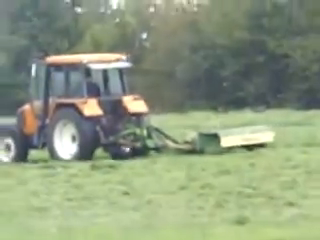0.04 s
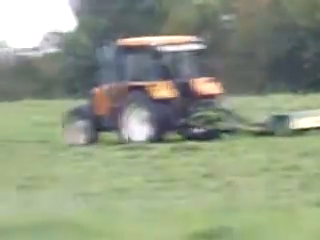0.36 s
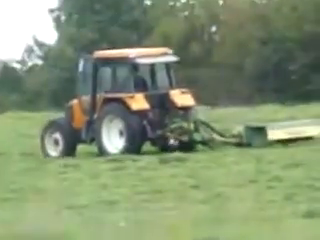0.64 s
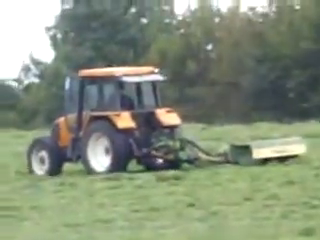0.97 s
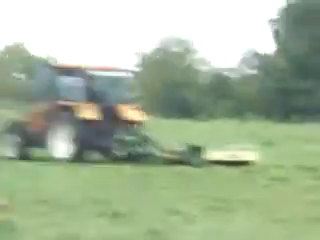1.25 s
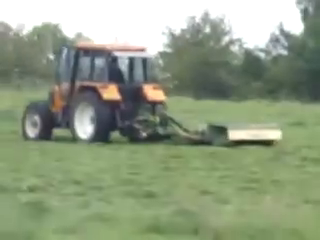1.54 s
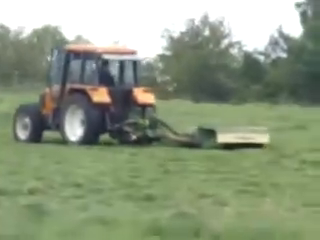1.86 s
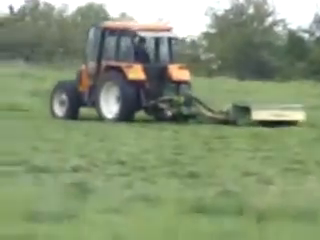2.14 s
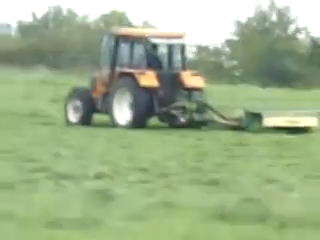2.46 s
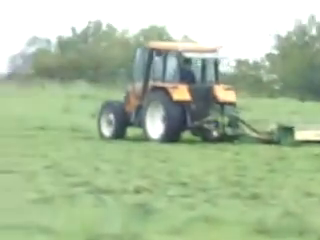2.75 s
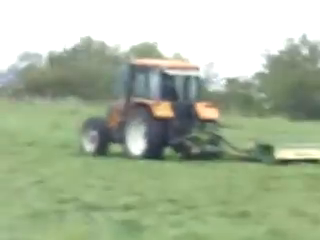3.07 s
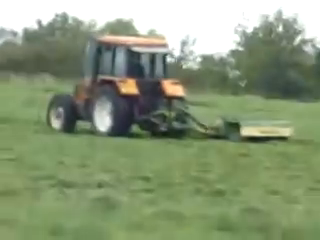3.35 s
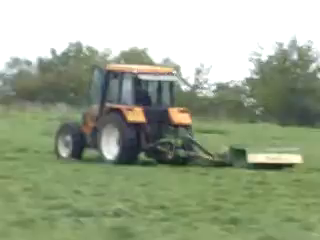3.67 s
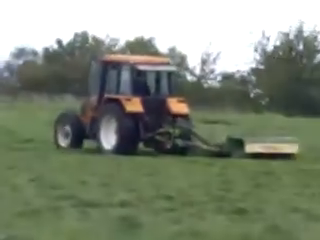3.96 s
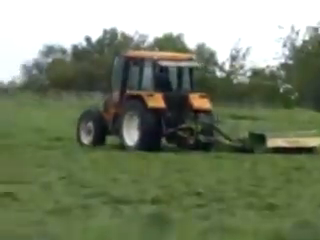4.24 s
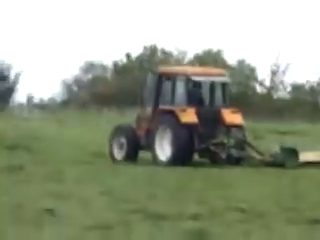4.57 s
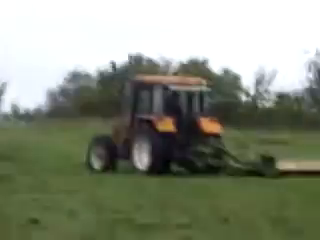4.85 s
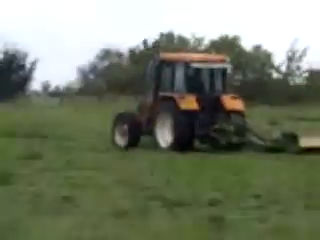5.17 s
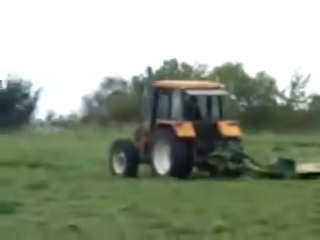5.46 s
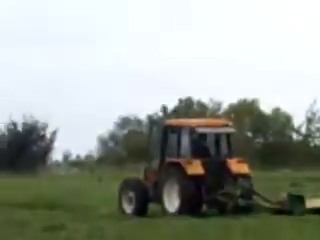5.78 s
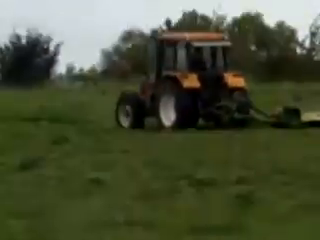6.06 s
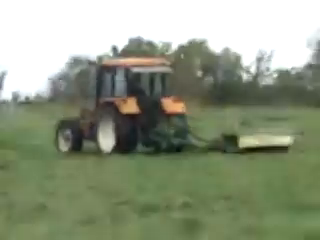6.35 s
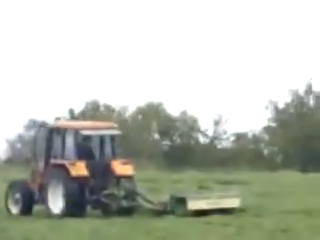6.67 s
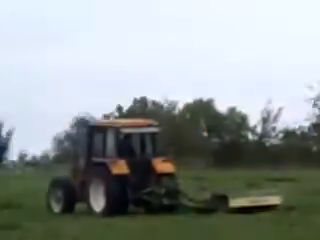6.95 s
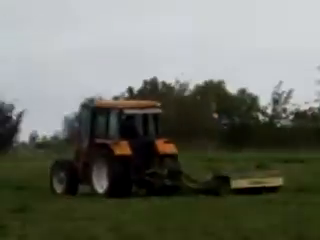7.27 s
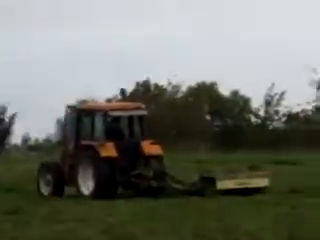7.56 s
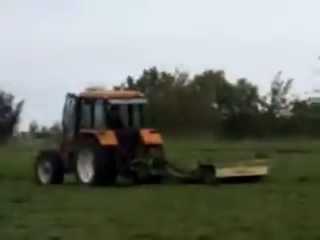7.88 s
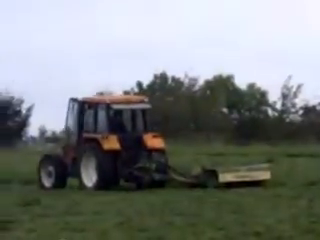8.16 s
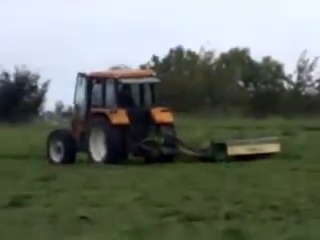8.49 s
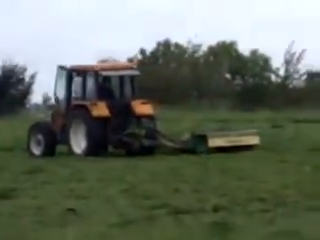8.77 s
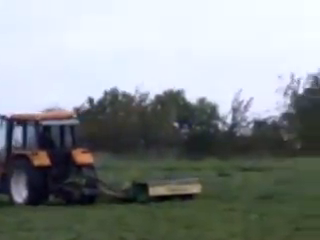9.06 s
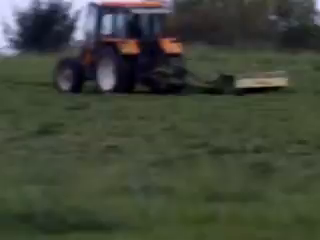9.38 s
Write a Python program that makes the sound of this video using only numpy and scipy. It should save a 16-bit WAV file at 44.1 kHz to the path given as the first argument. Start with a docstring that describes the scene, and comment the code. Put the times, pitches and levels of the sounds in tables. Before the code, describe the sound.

A diesel tractor pulls a rotary mower across an open field, heard from a distance on a hand-held microphone with a slightly dull sound. From the start, engine and rotor make a low, throbbing drone under a steady roar of clatter and cut grass. At about 1.1 seconds the sound cuts out for an instant, then fades back in. A faint gear whine swells around 2.5 seconds. Small ticks sound on the microphone near 0.5 seconds, and fingers rub and bump it at about 3.7 seconds. Near 4.9 seconds a sharp, close knock briefly dips the level, followed by more ticks until 5.5 seconds. The steel linkage rattles lightly, most from 5 to 6.5 seconds. The engine labours briefly near 3, 7.6 and 8.4 seconds, and keeps droning, slightly farther away, until the end at about 9.4 seconds.

```python
"""A diesel tractor pulls a rotary mower across a field, about 40 m from a hand-held mono camera.
From the start, exhaust and rotor throb at nearly one pitch under a roar of engine clatter and cut grass.
Just after a second the sound cuts out and fades back in; from 3 s the tractor turns its tail to us.
Fingers rub and tick right by the microphone, and near 5 s one sharp knock ducks the gain.
The linkage then rattles over rough ground, and the engine labours twice more as it draws away."""
import sys
import numpy as np
from scipy import signal
from scipy.fft import rfft, irfft
from scipy.io import wavfile
from scipy.ndimage import uniform_filter1d

SR = 44100
rng = np.random.default_rng(int(sys.argv[2]) if len(sys.argv) > 2 else 0)


def materialize(psi):
    """Save the field psi as 16-bit PCM at rate SR to the path in sys.argv[1].

    A 1-D psi becomes a single channel; in a 2-D psi each row is a channel.
    """
    bounded = np.clip(np.atleast_2d(psi).T, -1, 1)
    quanta = np.round(bounded * 32767).astype(np.int16)
    wavfile.write(sys.argv[1], SR, quanta)


N = 415422
T = np.arange(N) / SR
HZ = np.fft.rfftfreq(N, 1 / SR)
CYLINDERS, ROTOR_TURNS_PER_FIRING = 6, 1.0627
BREAK_START_S, BREAK_END_S = 1.098, 1.1215  # the sound cuts out between these times
OPENING = T < BREAK_END_S


def amp(db):
    """Decibels to gain."""
    return 10 ** (np.asarray(db) / 20)


def unit(x):
    """Scales to rms 1."""
    return x / np.sqrt(np.mean(x ** 2) + 1e-20)


def curves(rows):
    """Each column of a time table, at every sample."""
    times, *columns = np.transpose(rows)
    return [np.interp(T, times, column) for column in columns]


def shape(x, points):
    """Filters x by a gain curve of (Hz, dB) points."""
    hz, db = np.transpose(points)
    return irfft(rfft(x) * amp(np.interp(np.log(HZ + 1), np.log(hz), db)), N)


def band(x, low_hz, high_hz):
    """The part of x between two frequencies."""
    return irfft(rfft(x) * (HZ > low_hz) * (HZ < high_hz), N)


def drift(rate_hz):
    """Slow random motion of rms 1, up to about rate_hz."""
    return unit(irfft(rfft(rng.standard_normal(N)) * np.exp(-(HZ / rate_hz) ** 2), N))


def hump(peak_s, rise_s, fall_s):
    """A smooth bell of height 1 around peak_s."""
    return np.exp(-np.maximum((peak_s - T) / rise_s, (T - peak_s) / fall_s) ** 2)


def impulses(per_s, heights):
    """Clicks at random times, with heights drawn from a range."""
    return (rng.random(N) < per_s / SR) * rng.uniform(*heights, N)


def add(mix, start_s, sound):
    """Mixes a sound in at start_s."""
    part = mix[round(start_s * SR):][:len(sound)]
    part += sound[:len(part)]


def harmonics(turns, rows, flutter_hz):
    """Shaft harmonics from (multiple, dB, flutter depth) rows; load and air flutter level and phase."""
    out = np.zeros(N)
    for multiple, db, flutter in rows:
        angle = 2 * np.pi * round(multiple) * turns
        in_phase = np.cos(angle) * (1 + flutter * drift(flutter_hz))
        quadrature = np.sin(angle) * flutter * drift(flutter_hz)
        out += amp(db) * unit(in_phase + quadrature)
    return out


def low_pass(x, edge_hz):
    """A steep band limit on both channels."""
    taps = signal.firwin(511, edge_hz, window=("kaiser", 8), fs=SR)
    return signal.oaconvolve(x, taps[None], "same")


# A low hum in the background. Each row: time in seconds, pitch in Hz, level in dB.
HUM_PATH = [(0, 59.2, -51), (1.1, 59.6, -52), (1.13, 52.5, -44), (3.9, 51.7, -42.5), (4.8, 57.4, -45),
            (9.4, 58.4, -43)]


def hum():
    """A faint wandering tone below the engine note."""
    hz, db = curves(HUM_PATH)
    return amp(db) * unit(np.sin(2 * np.pi * np.cumsum(hz) / SR))


# The steel linkage behind the tractor. Each row: pitch in Hz, relative level in dB, decay in seconds.
LINKAGE_MODES = [(2106, 1.5, 0.015), (2198, 0, 0.0099), (2500, -14, .003), (3430, -13.5, .003)]


def linkage_rattle():
    """Loose joints knock together at random, harder over one patch of rough ground."""
    knocks = impulses(per_s=70, heights=(0.74, 1))
    t = T[:SR // 20]
    ring = sum(amp(db) * np.sin(2 * np.pi * hz * t) * np.exp(-t / decay)
               for hz, db, decay in LINKAGE_MODES)
    rough_ground = hump(5.85, 0.75, 0.75)
    return amp(-45 + 9.5 * rough_ground) * unit(signal.oaconvolve(knocks, ring)[:N])


# Skin on the case, heard close up. Each row: frequency in Hz, relative level in dB.
RUB_SPECTRUM = [(200, -19), (1000, -13.5), (2000, 0.5), (3000, -4), (4200, 1.5), (5200, -2.5), (6200, -5.5),
                (7200, -18)]
# Finger strokes by the microphone. Each row: peak time in seconds, level in dB, rise and fall in seconds.
FINGER_STROKES = [(3.659, -24.5, 0.01, 0.011), (3.72, -17.5, 0.013, 0.025), (3.82, -34.5, .01, .04),
                  (4.859, -24, 0.033, 0.013), (4.92, -30, 0.024, 0.093)]


def finger_rub():
    """Skin drags over the case in tiny slips; each stroke swells and dies inside a light, longer drag."""
    pressure = np.zeros(N)
    drag_db, drag_stretch = -14, 12
    for peak_s, db, rise, fall in FINGER_STROKES:
        from_peak = np.maximum((peak_s - T) / rise, (T - peak_s) / fall)
        pressure += amp(db) * (np.exp(-from_peak) + amp(drag_db) * np.exp(-from_peak / drag_stretch))
    slips = rng.standard_normal(N) * amp(2.0 * drift(250))
    catches = impulses(per_s=540, heights=(-1.2, 1))  # ridges of the skin catch and let go
    return pressure * unit(shape(slips + amp(-4) * unit(catches), RUB_SPECTRUM))


# Ticks on the camera body. Each row: start in seconds, level in dB, decay in seconds, centre in Hz,
# half width in octaves.
FINGER_TICKS = [(0.453, -15, 0.0027, 2700, 0.3), (0.457, -10.5, 0.00098, 3380, 0.4),
                (.5292, -10, .0016, 2780, 0.64), (2.128, -24.5, 0.0048, 3000, 0.65),
                (2.884, -23, .008, 3350, .7), (3.7047, -17, 0.0053, 2720, 0.6),
                (3.71, -10, 0.0026, 4100, 1.2), (4.761, -22, .003, 3600, .8),
                (4.808, -21, .0027, 3550, 0.73), (4.8523, -7, 0.0016, 4000, 2.1),
                (5.2638, -8.5, 0.0033, 4030, 0.44), (5.274, -16.5, 0.012, 4200, 0.36),
                (5.311, -20.5, 0.016, 3850, 0.54), (5.3647, -14, .005, 4580, 0.36),
                (5.372, -17, 0.0088, 3920, 0.49), (5.4913, -14, 0.014, 4680, 0.4),
                (5.503, -18.5, 0.015, 4680, 0.15)]


def finger_ticks():
    """In each tick a snap and a little dying grit ring one band of the case."""
    out, t = np.zeros(N), T[:SR // 4]
    snap = 5.1 * (t == 0)
    for start_s, db, decay, centre_hz, octaves in FINGER_TICKS:
        rising, dying = 1 - np.exp(-t / (0.035 * decay)), np.exp(-t / decay)
        grit = rng.standard_normal(len(t)) * rising * dying
        edges_hz = np.clip(centre_hz * 2 ** (octaves * np.array([-1, 1])), 1, SR / 2 - 1)
        b, a = signal.butter(1, edges_hz, "bandpass", fs=SR)
        ring = signal.lfilter(b, a, signal.lfilter(b, a, snap + grit))
        add(out, start_s, amp(db) * unit(ring) * np.sqrt(np.mean(dying ** 2)))
    return out


# Bumps at the microphone. Each row: start in seconds, push in dB, direction as a sign, decay in seconds.
MICROPHONE_BUMPS = [(3.7106, -16.5, -1, 0.04), (4.857, -9.5, 1, 0.031), (5.268, -22, 1, 0.027)]


def bumps():
    """Each bump presses one way on the microphone and eases off."""
    out, t = np.zeros(N), T[:SR // 4]
    for start_s, db, sign, decay in MICROPHONE_BUMPS:
        push = (1 - np.exp(-t / 0.0015)) * np.exp(-t / decay)
        add(out, start_s, np.sign(sign) * amp(db) * push)
    return out


def knock(start_s=4.8542, ring_hz=5450):
    """One hard knock on the camera: a short push, then a brief ring of the case."""
    out, t = np.zeros(N), T[:SR // 4]
    push = np.exp(-t / 0.000092)
    ring = 0.41 * np.sin(2 * np.pi * ring_hz * t) * np.exp(-t / 0.0025)
    add(out, start_s, amp(5.5) * (push + ring))
    return out


# Resonances of the camera's plastic shell. Each row: centre in Hz, width in Hz, lift in dB.
SHELL_MODES = [(3400, 110, 3), (3900, 140, 4), (4400, 110, 1), (4720, 120, 2.5)]
# The microphone's treble roll-off on the touches. Each row: frequency in Hz, gain in dB.
MICROPHONE_ROLLOFF = [(20, 5), (4700, 0), (5300, -4.5), (6200, -7.5), (6700, -18.5), (7200, -39)]


def handling():
    """Every touch rings the shell; the microphone dulls the touches above 5 kHz."""
    touches = finger_rub() + finger_ticks() + bumps() + knock()
    ring = sum((amp(db) - 1) * signal.lfilter(*signal.iirpeak(hz, hz / width, fs=SR), touches)
               for hz, width, db in SHELL_MODES)
    return shape(touches + ring, MICROPHONE_ROLLOFF)


def gear_whine(firings):
    """Gears beam their whine sideways: clear at first, then faint except as the beam sweeps past us."""
    beam = hump(peak_s=2.59, rise_s=1.8, fall_s=0.31)
    level_db = np.where(OPENING, -40.5, -49 + 9 * beam) + 0.5 * drift(2.8)
    return amp(level_db) * harmonics(firings, [(5, 0, 0.27)], flutter_hz=4.3)


# Silencer and mower deck from across the field. Each row: frequency in Hz, relative level in dB.
BOOM_SPECTRUM = [(15, -28), (40, -16.5), (70, -7.5), (100, -10.5), (125, -0.5), (165, 0.5), (195, -4),
                 (240, -13.5), (320, -18), (450, -29.5), (900, -76.5)]


def boom():
    """The silencer and the mower deck boom with steady low noise."""
    return amp(-33.5) * unit(shape(rng.standard_normal(N), BOOM_SPECTRUM))


def exhaust_note(firings):
    """The exhaust pulses make one steady low tone at the firing rate."""
    return harmonics(firings, [(1, -33.5, 0.048)], flutter_hz=3)


# Side tones of the exhaust. Each row: multiple of the engine cycle, relative level in dB, flutter depth.
UNEVEN_TONES = [(7, -52.5, .4), (8, -44.5, 0.9), (9, -38.5, 0.4), (10, -41.5, 1), (11, -52.5, 0.7),
                (12, -41.5, 0.7), (13, -49, 1)]
# Moments when the engine labours. Each row: peak time in seconds, lift in dB, half length in seconds.
ENGINE_LABOURS = [(2.96, 6, 0.079), (7.62, 7, 0.088), (8.37, 7.5, .18)]


def uneven_cylinders(firings):
    """The cylinders fire more or less unevenly as the load wanders, and most when the engine labours."""
    labour_db = sum(db * hump(peak_s, half_s, half_s) for peak_s, db, half_s in ENGINE_LABOURS)
    level_db = -2.5 + labour_db + 1.5 * drift(1.6)
    return amp(level_db) * harmonics(firings / CYLINDERS, UNEVEN_TONES, flutter_hz=1.2)


# Tones of the mower. Each row: multiple of the rotor speed, relative level in dB, flutter depth.
ROTOR_TONES = [(1, -39, 0.2), (2, -28, 0.16), (8, -46, 1.12), (16, -52, 0.99)]
# Thicker and thinner grass along the way. Each row: time in seconds, gain of the rotor drone in dB.
GRASS_LOAD = [(0, 0), (.35, -2), (.6, 2), (.75, -4), (.88, 2), (1.1, -1), (1.6, -1.5), (2.3, -1), (2.6, 1),
              (2.9, 1), (3.1, 4), (3.35, -1), (3.65, 1.5), (3.85, -2.5), (4.3, -2.5), (4.68, 2),
              (4.85, 2.5), (5.12, -5), (5.35, -1.5), (6.1, 0.5), (6.3, -1), (6.9, 1.5), (7.25, -1),
              (7.7, 0.5), (9.42, -0.5)]


def mower_rotor(firings):
    """Two blades make the second harmonic strongest; 6% above the firing rate, the rotor beats with it."""
    load_db, = curves(GRASS_LOAD)
    return amp(load_db) * harmonics(firings * ROTOR_TURNS_PER_FIRING, ROTOR_TONES, flutter_hz=7)


# The mower's steel panels. Each row: centre in Hz, width in Hz, lift or dip in dB, rms flare in dB.
PANEL_BANDS = [(672.5, 34, 3.5, 2), (792, 20, 3, 2), (918, 30, 3.5, 2.5), (1133, 14, 3, 2.5),
               (1245, 17, 1.5, 0.5), (1349, 23, 1.5, 2), (1745, 76, -2, 1), (1846, 40, 3, 2),
               (2168, 37, 3, 2.1), (2520, 35, -3.5, 1), (2750, 37, 3, 1.5), (3560, 270, -4.5, 0),
               (3500, 70, 1.2, 1), (3640, 41, 1.5, 1.5)]


def mower_panels(drive):
    """Each panel colours its own narrow band, which flares and fades on its own."""
    spectrum, out = rfft(drive), drive.copy()
    for hz, width, db, flare_db in PANEL_BANDS:
        ring = irfft(spectrum / (1 + (2 * (HZ - hz) / width) ** 2), N)
        out += ring * (amp(db + flare_db * drift(2.7)) - 1)
    return out


def clatter_and_grass(firings):
    """Diesel clatter pulses with the firings, blades whip through grass, and stalks patter on the deck."""
    clatter = 1 + 0.038 * np.cos(2 * np.pi * firings) + 0.046 * np.cos(2 * np.pi * firings / CYLINDERS)
    whip = 1 + 0.026 * np.cos(4 * np.pi * firings * ROTOR_TURNS_PER_FIRING)
    stalks = impulses(per_s=900, heights=(-0.84, 1))
    rush = rng.standard_normal(N) * clatter * whip * amp(0.22 * drift(25))
    return rush + amp(-12.5) * unit(stalks)


# The roar at the microphone: before the break, after it, and with the tractor's tail towards us.
# Each row: frequency in Hz, relative level in dB.
OPENING_SPECTRUM = [(180, -32), (300, -11.5), (399, -8.5), (437, -14.5), (544, -11), (595, -10.5),
                    (669, -7), (761, -7.5), (823, -2), (1010, -3.5), (1380, -0.5), (1610, -11),
                    (2010, -2.5), (2470, -12), (2810, -5.5), (3400, -9.5), (3700, -14), (4250, -9.5),
                    (4800, -18), (5050, -14), (5600, -23), (5950, -24.5), (6600, -39), (8580, -88),
                    (14500, -120)]
PASSING_SPECTRUM = [(180, -42), (300, -17), (364, -18), (394, -12), (431, -16), (503, -8), (558, -9),
                    (669, -2.5), (866, -5.5), (1360, -5), (1760, -9.5), (2110, -7), (2880, -16), (3280, -8),
                    (4840, -15.5), (5580, -22.5), (6100, -29.5), (6600, -39.5), (8580, -94), (14500, -120)]
TAIL_ON_SPECTRUM = [(180, -43.5), (300, -11.5), (399, -7.5), (437, -10), (660, -2.5), (812, -1), (1050, -4),
                    (1380, -2.5), (1960, -6), (2200, -4), (2440, -4.5), (2600, -13), (2810, -9),
                    (3200, -12), (3500, -4), (3820, -11.5), (4650, -12), (5100, -15.5), (5550, -22),
                    (5950, -24.5), (6350, -31), (6650, -41), (8580, -83), (14500, -120)]


def roar(firings, distance_m=40, away_m_per_s=1.07, turn_start_s=3.1, turn_length_s=2.9):
    """Engine and mower noise across the field changes colour as the tractor turns, and sinks as it goes."""
    drive = mower_panels(clatter_and_grass(firings))
    turned = np.clip((T - turn_start_s) / turn_length_s, 0, 1)
    stages = [(OPENING, OPENING_SPECTRUM, -7.5),
              (~OPENING * (1 - turned), PASSING_SPECTRUM, -8.5),
              (turned, TAIL_ON_SPECTRUM, -6.5)]
    blend, treble_db = np.zeros(N), np.zeros(N)
    for share, spectrum, treble_over_mids_db in stages:
        sound = shape(drive, spectrum)
        blend += share * sound / np.std(band(sound, 550, 2500))
        treble_db += share * treble_over_mids_db
    spreading = distance_m / (distance_m + away_m_per_s * T)
    air_swell_db = 0.41 * drift(1.2)
    level = spreading * amp(-25 + 1.0 * OPENING + air_swell_db)
    treble = band(blend, 3000, SR / 2)
    body = (blend - treble) * amp(0.9 * hump(7.03, 0.7, 0.7))  # one long swell as the tractor leaves
    even_treble = treble / np.sqrt(uniform_filter1d(treble ** 2, size=SR // 4))
    flicker_db = 0.55 * drift(19)  # moving air makes the treble flicker on its own
    return level * (body + amp(treble_db + flicker_db) * even_treble)


# The tractor's engine speed over the field. Each row: time in seconds, firings a second.
ENGINE_SPEED = [(0.0, 80.29), (0.7, 80.36), (1.2, 79.74), (2.6, 79.63), (3.3, 79.28), (4.0, 78.68),
                (4.5, 78.71), (5.0, 78.79), (5.6, 79.73), (6.4, 79.4), (7.0, 79.97), (8.0, 78.98),
                (8.5, 79.84), (9.0, 79.24), (9.42, 79.34)]


def scene():
    """Tractor and mower out in the field, fingers at the microphone; the same in both channels."""
    firings = np.cumsum(curves(ENGINE_SPEED)[0]) / SR
    firings -= np.interp(0.11, T, firings)  # exhaust and rotor are in phase at 0.11 s: the first throb
    note = exhaust_note(firings)
    drone = uneven_cylinders(firings) + mower_rotor(firings) + boom()
    drone *= amp(2.5 * OPENING)  # stronger before the break
    mono = note + drone + gear_whine(firings) + hum() + roar(firings) + linkage_rattle() + handling()
    return np.array([mono, mono])


def gain_control(dry, threshold_db=-1.06, attack_s=0.00007):
    """The camera ducks at once on a peak, then wins back most of its gain quickly and the rest slowly."""
    over_db = 20 * np.log10(abs(dry).max(0) + 1e-9) - threshold_db
    quick, slow = (np.maximum(np.maximum.accumulate(over_db + release * T) - release * T, 0)
                   for release in (17, 7))
    duck_db = 1.53 * np.maximum(quick, 0.35 * slow)
    lag = np.exp(-1 / (attack_s * SR))
    return dry * amp(-signal.lfilter([1 - lag], [1, -lag], duck_db))


def record(dry):
    """The camera's input: gain control, a narrow band, a short break and fade back in, and overload."""
    narrow = low_pass(gain_control(dry), edge_hz=6950)
    fade_db = -12 * np.exp(-np.maximum(T - BREAK_END_S, 0) / 0.22)
    break_db = np.select([T < BREAK_START_S, T <= BREAK_END_S], [0, -38], fade_db)
    clipped = np.clip(narrow * amp(break_db), -0.95, 0.95)
    return low_pass(clipped, edge_hz=11000)


dry = scene()
out = record(dry)
materialize(out)
```